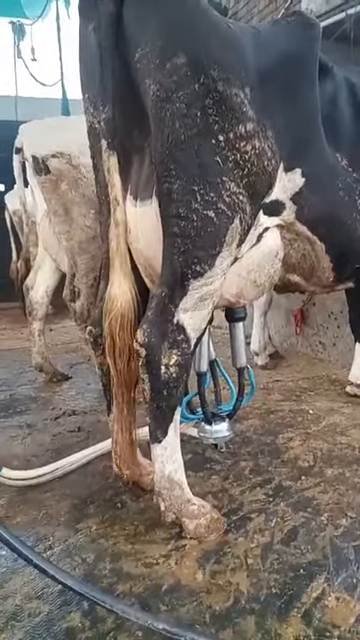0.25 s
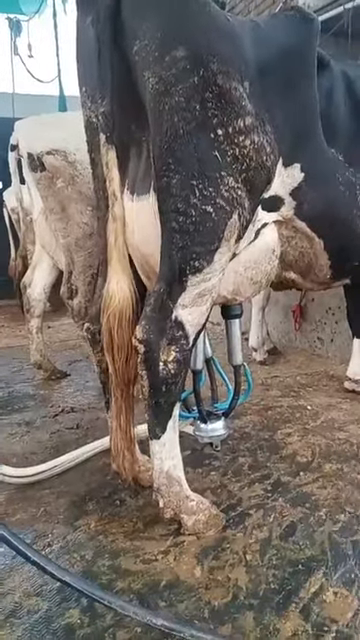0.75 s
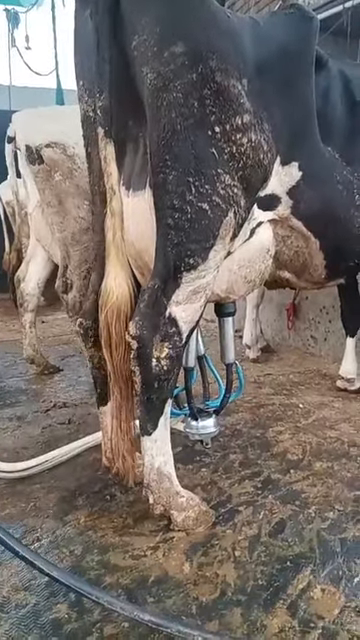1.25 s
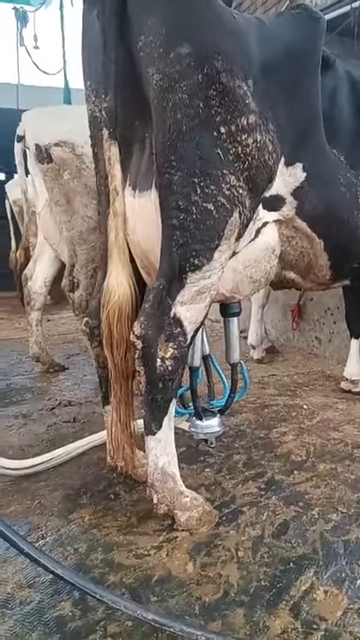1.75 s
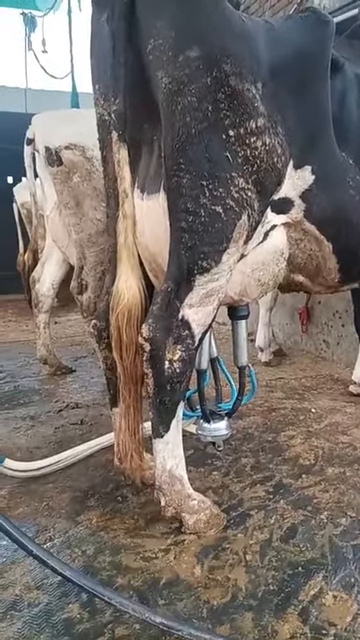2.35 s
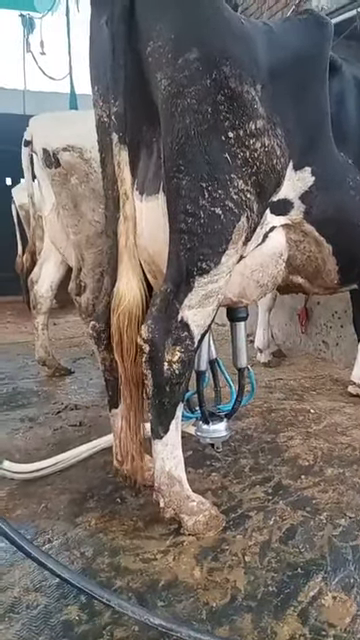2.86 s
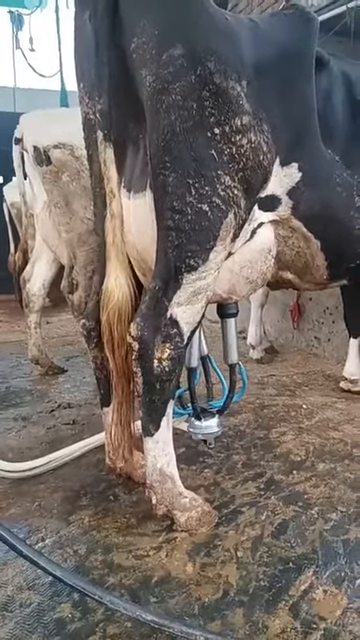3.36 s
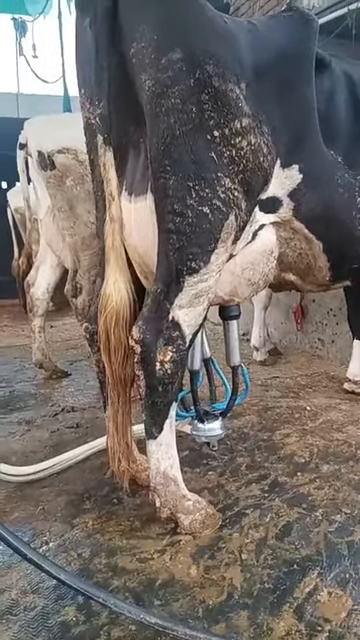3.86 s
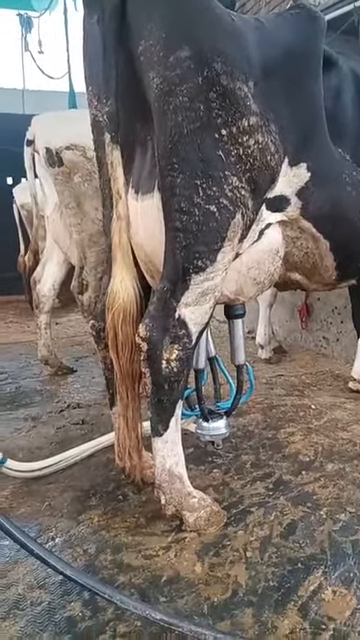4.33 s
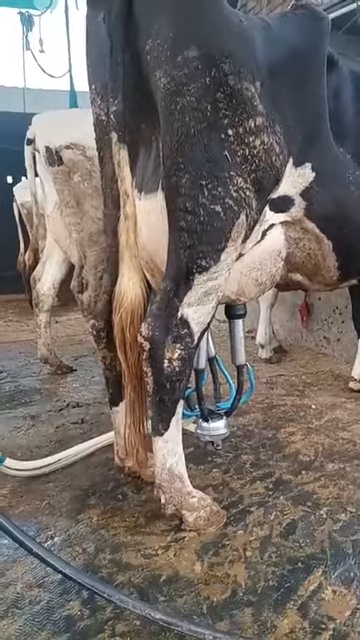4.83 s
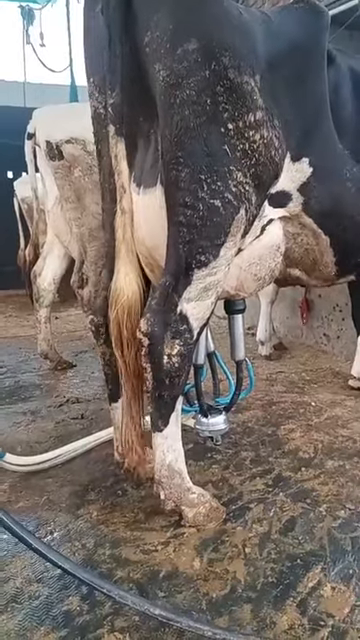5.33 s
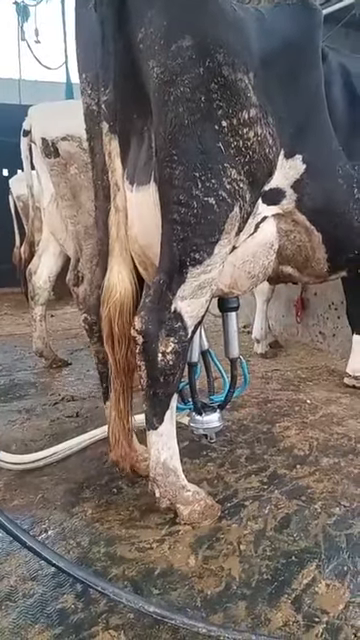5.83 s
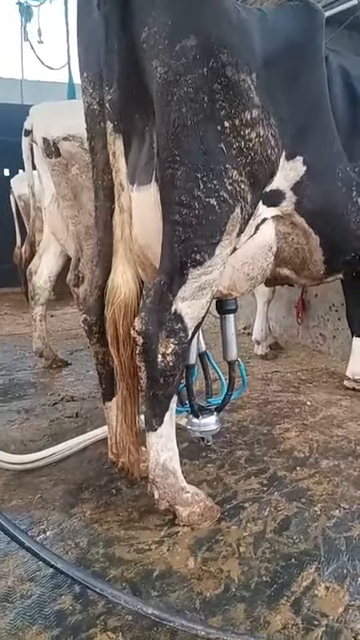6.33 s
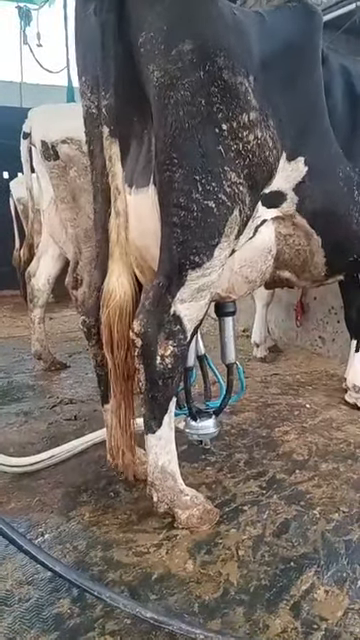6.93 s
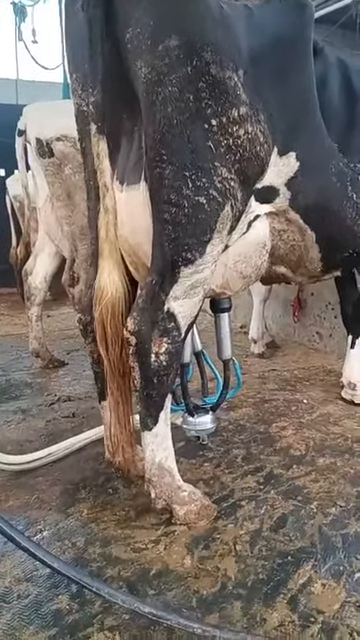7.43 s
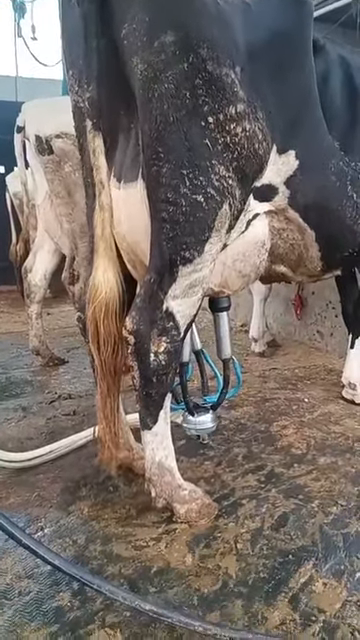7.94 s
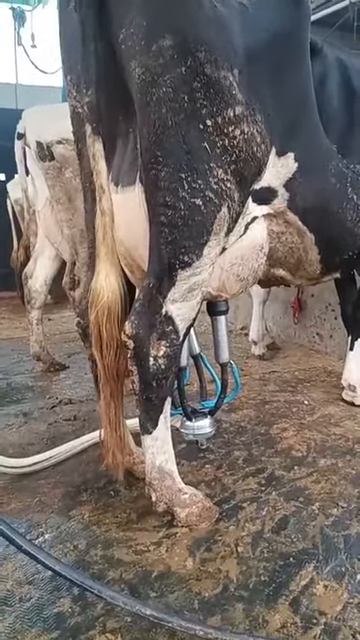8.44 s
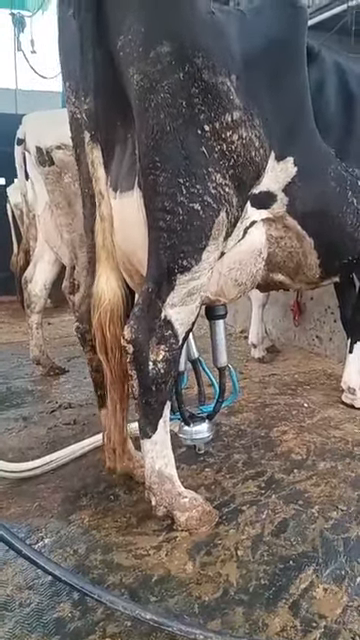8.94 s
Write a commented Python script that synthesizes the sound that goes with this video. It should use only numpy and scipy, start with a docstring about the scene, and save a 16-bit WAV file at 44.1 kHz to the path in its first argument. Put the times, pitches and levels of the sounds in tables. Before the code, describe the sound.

A milking machine runs in an open shed for the whole nine seconds or so. Its valve ticks sharply and evenly, a little over three times a second, each metallic click followed by a small puff and rush of air. Beneath it the vacuum pump makes a constant hum with uneven low chuffing, a rattling casing and a faint high whistle, while its belt rubs in a hissy pulse about six times a second. From about 1 to 3 seconds a small bird gives seven high, squeaky, gliding chirps, growing louder and harsher and echoing briefly under the roof. The machine then continues at the same pace, a few ticks ringing slightly brighter between 4 and 6 seconds. Dull, distant thuds sit low in the rumble at around 3.7, 8.3 and 8.9 seconds.

```python
"""A milking machine runs on a cow in an open shed. Its pulsator's slide strikes each end stop in turn,
ringing the valve body and letting air rush into the tubes. Beneath this the vacuum pump hums, booms,
rattles and whistles, and its belt rubs once a turn. A small bird gives seven squeaky chirps, gliding
harmonic tones that reverberate under the roof. A few dull thuds lie in the shed's low rumble."""
import sys
import numpy as np
from scipy import signal
from scipy.fft import rfft, irfft, next_fast_len
from scipy.io import wavfile
from scipy.ndimage import uniform_filter1d, map_coordinates

SR = 44100
rng = np.random.default_rng(int(sys.argv[2]) if len(sys.argv) > 2 else 0)


def to_wav(sig):
    """Store sig (one row per channel, or 1-D mono) as 16-bit WAV at the path in sys.argv[1].

    Samples outside -1..1 are clipped; the rate is SR.
    """
    pcm = np.clip(np.atleast_2d(sig), -1, 1) * 32767
    pcm = np.round(pcm).astype(np.int16)
    wavfile.write(sys.argv[1], SR, pcm.T)  # frames by channels


N = 405043
T = np.arange(N) / SR
SIZE = next_fast_len(N, True)
FREQ = np.maximum(np.arange(SIZE // 2 + 1) * SR / SIZE, 1)
SWAY_HZ = 1.522  # slow swing in the level of hum and casing

# Slow changes in the level of exhaust and casing. Each row: time in seconds, gain in dB.
PUMP_LOAD = [(0, 1), (1.7, -0.5), (1.95, -1), (2.3, -0.5), (2.56, -0.5), (2.8, 2.5), (3.1, -1.5),
             (3.6, 1.5), (4.4, 1.5), (5.1, 1), (6.15, 1), (6.37, -2), (6.6, 2), (7.35, -1), (7.9, 1),
             (9.1, 0.5)]


def undb(db):
    """Decibels to amplitude ratio."""
    return 10 ** (np.asarray(db) / 20)


def unit(x):
    """Normalise to rms 1."""
    return x / np.sqrt(np.mean(x ** 2))


def even(x):
    """Hold the running rms at 1, keeping the fast grain."""
    return x / np.sqrt(uniform_filter1d(x ** 2, size=3500))


def slope(points):
    """Frequency response through (Hz, dB) points, rolling off beyond both ends."""
    hz, db = np.transpose(points)
    gain = undb(np.interp(np.log(FREQ), np.log(np.sort(hz)), db))
    return gain * np.minimum(FREQ / hz.min(), 1) ** 3 * np.minimum(hz.max() / FREQ, 1) ** 6


def resonances(modes, skirt):
    """Response of (Hz, width in Hz, dB) modes added in power; skirt steepens their flanks."""
    powers = (undb(db) ** 2 / (1 + ((FREQ - hz) / width) ** 2) ** skirt for hz, width, db in modes)
    return np.sqrt(sum(powers))


def colour(x, gain):
    """Filter by a frequency response."""
    return irfft(rfft(x, SIZE) * gain, SIZE)[:N]


def walk(rate_hz):
    """Low-pass random fluctuation of rms 1."""
    draws = rfft(rng.standard_normal(SIZE // 16))
    return unit(irfft(draws * np.exp(-(FREQ[:len(draws)] / rate_hz) ** 2), SIZE)[:N])


def noise(gain, grain_db=0):
    """Coloured noise of rms 1; grain_db breaks its excitation into millisecond bursts."""
    grain = undb(grain_db * walk(400)) if grain_db else 1
    return unit(colour(rng.standard_normal(N) * grain, gain))


def hiss(points, flicker_db, count=11):
    """Turbulence: interleaved narrow noise bands fluctuate independently in level."""
    band_hz, hold_s = 150, .06
    spectrum = rfft(rng.standard_normal(SIZE)) * slope(points)
    band = (FREQ / band_hz).astype(int) % count
    knots = np.arange(0, T[-1] + hold_s, hold_s)
    gains = undb(flicker_db * rng.standard_normal((count, len(knots))))
    return unit(sum(irfft(spectrum * (band == k), SIZE)[:N] * np.interp(T, knots, gains[k])
                    for k in range(count)))


def cycle(hz, crest_s):
    """Sinusoidal swing between -1 and 1."""
    return np.cos(2 * np.pi * hz * (T - crest_s))


def bursts(rows, rise_s, fall_s):
    """Envelope of (s, dB) bursts with exponential growth and decay."""
    out, age = np.zeros(N), T[:SR // 2]
    shape = (1 - np.exp(-age / rise_s)) * np.exp(-age / fall_s)
    for s, db in rows:
        start = max(int(s * SR), 0)
        out[start:start + len(age)] += undb(db) * shape[:N - start]
    return out


def surging(steady_db, rows, width_s):
    """Envelope of a running level with Gaussian (s, dB) surges added in power."""
    surges = sum(undb(db) ** 2 * np.exp(-((T - s) / width_s) ** 2) for s, db in rows)
    return np.sqrt(undb(steady_db) ** 2 + surges)


def shed(x, wet_db, t60, floor_db):
    """Reverberation: direct sound, a reflection off the concrete floor and a diffuse tail."""
    age = T[:SR]
    tail = rng.standard_normal(SR) * undb(-60 * age / t60) * (1 - np.exp(-age / .0052))
    response = undb(wet_db) * tail / np.sqrt(np.sum(tail ** 2))
    response[int(.0028 * SR)] += undb(floor_db)
    response[0] = 1
    return signal.fftconvolve(x, response / np.sqrt(np.sum(response ** 2)))[:N]


def throb():
    """Amplitude modulation, once per turn of the pump shaft."""
    return cycle(hz=5.235, crest_s=.186)


def waver(x):
    """Frequency modulation: every pitch drifts with the pump's speed."""
    return map_coordinates(x, [np.cumsum(1 + .005 * walk(5))], order=1, mode="mirror")


def belt_turn(delay_s):
    """Phase modulation: the belt's cycle runs early or late as it slips."""
    # Each row: time in seconds, lag in seconds.
    slip = [(.4, -.007), (1, 0.0051), (1.7, 0.0011), (2.5, -0.019), (3.9, -0.00013), (4.6, -0.00032),
            (5.5, -0.021), (6, -0.0098), (7.1, -0.014), (7.7, -0.01), (8.3, -0.00011), (9.1, 0.0071)]
    return cycle(hz=5.863, crest_s=.101 + delay_s + np.interp(T, *np.transpose(slip)))


def motor():
    """Forced vibration: the motor hums in a few wandering spectral lines."""
    # Each row: frequency in Hz, relative level in dB.
    lines = [(50, -25.5), (102.3, -22.5), (105, -5.5), (112, -11.5), (209.5, -9)]
    # Each row: time of a swell in seconds, level in dB.
    swells = [(2.40, -39), (2.87, -43), (3.08, -41.5), (3.51, -46), (4.91, -48), (6.34, -41), (6.71, -40),
              (7.10, -42.5), (7.48, -40), (7.70, -47), (8.39, -37), (8.91, -41)]
    hum = unit(sum(undb(db) * np.sin(2 * np.pi * np.cumsum(hz * (1 + .0111 * walk(5.64))) / SR)
                   for hz, db in lines))
    level_db = -51 + 1.6 * cycle(SWAY_HZ, crest_s=.41) + 2.6 * walk(13)
    return hum * surging(level_db, swells, width_s=.017)


def exhaust():
    """Resonance: uneven noise excites the exhaust's low modes, which boom and chuff."""
    # Each row: frequency in Hz, width in Hz, relative level in dB.
    modes = [(185.3, 20, -5), (216.5, 15, -2), (248, 12, 5.5), (286, 51, 2.5), (308, 39.5, 6),
             (344.2, 7.6, 7.5)]
    # Each row: time of a chuff in seconds, level in dB.
    chuffs = [(.538, -36.5), (.62, -39), (.8, -38.5), (.97, -38.5), (1.13, -48), (1.3, -39.5), (1.36, -35),
              (1.52, -37), (1.69, -37.5), (2.06, -39), (2.3, -40), (2.9, -64), (3.88, -52), (4.04, -35.5),
              (4.33, -48), (4.55, -35.5), (4.77, -34.5), (5.42, -35.5), (5.55, -39.5), (5.72, -41.5),
              (6.1, -43), (6.48, -42), (6.67, -38.5), (6.75, -37), (6.87, -42), (7.19, -36.5), (7.62, -41),
              (7.89, -38), (8.35, -40), (8.62, -40), (8.79, -44), (8.99, -38.5)]
    boom = even(waver(noise(resonances(modes, skirt=3.8), grain_db=3.5)))
    level_db = -45.5 + np.interp(T, *np.transpose(PUMP_LOAD)) + .5 * throb() + 2.6 * walk(27)
    return boom * surging(level_db, chuffs, width_s=.027)


def casing():
    """Modal vibration: each mode flares by itself; a shudder drives those near its pitch hardest."""
    # Each row: frequency in Hz, width in Hz, relative level in dB.
    modes = [(452, 24, -3), (583, 32, 2), (620, 64, -5.5), (622, 91, -3.5), (667, 20.4, 5), (745, 55, -5.5),
             (723, 28, -0.5), (796, 13, 10.5), (900, 25, -5), (1033, 40, -0.5), (1113.3, 15.7, 8),
             (1170, 40, -28), (1257, 78, -4), (1356.6, 20.3, 4), (1420, 22, -13.5), (1500, 46, -5),
             (1617, 20.8, 7), (1680, 12, -4), (1703, 40, -0.5), (1967, 97, -6)]
    # Each row: time of a shudder in seconds, level in dB, centre frequency in Hz.
    shudders = [(0.029, -38.5, 900), (.95, -38, 1400), (1.119, -38.5, 835), (1.502, -40.5, 900),
                (1.75, -35.5, 870), (2.842, -39, 900), (3.4, -40, 900), (4.1, -58, 800), (4.321, -37, 720),
                (4.68, -42, 800), (4.78, -36.5, 1000), (5.16, -40, 900), (5.36, -38.5, 1500),
                (5.52, -32.5, 1210), (5.73, -39.5, 1200), (6.07, -43, 800), (6.78, -42.5, 1200),
                (6.87, -40, 1300), (7.67, -38.5, 1020), (8.02, -48, 1100), (8.79, -50, 900),
                (8.97, -41, 1100)]
    rattle = np.zeros(N)
    for hz, width, db in modes:
        flare = undb(db + 3 * walk(7.4))
        rattle += flare * np.sqrt(width) * noise(resonances([(hz, width, 0)], skirt=1.64))
    level_db = -41.5 + np.interp(T, *np.transpose(PUMP_LOAD))
    swing_db = 1.5 * throb() + .7 * cycle(SWAY_HZ, crest_s=.21) + 1.16 * walk(120)
    out = even(waver(rattle)) * undb(level_db + swing_db)
    shaken = even(noise(resonances(modes, skirt=2.4), grain_db=5))
    width_s, width_octaves = .03, .8
    for s, db, hz in shudders:
        span = np.flatnonzero(np.abs(T - s) < .12)
        freq = np.maximum(np.fft.rfftfreq(len(span), 1 / SR), 1)
        band = np.exp(-(np.log2(freq / hz) / width_octaves) ** 2 / 2)
        ring = unit(irfft(rfft(shaken[span]) * band, len(span)))
        out[span] += ring * undb(db) * np.exp(-((T[span] - s) / width_s) ** 2 / 2)
    return out


def drone():
    """Light damping: the casing's strongest mode rings up as the pump labours."""
    # Each row: time of a surge in seconds, level in dB.
    surges = [(.01, -33), (.45, -42.5), (1.41, -36), (1.57, -47), (1.73, -48), (2.32, -43), (2.88, -37),
              (3.25, -47), (3.37, -35.5), (3.43, -40), (3.68, -47), (3.95, -52), (4.1, -40.5),
              (4.35, -40.5), (4.56, -45), (4.88, -39.5), (5.16, -43), (5.42, -40), (5.53, -42),
              (5.72, -41.5), (5.9, -48), (6.28, -43), (6.7, -53), (6.87, -47), (7.05, -44), (7.2, -40),
              (7.45, -45), (7.68, -43.5), (7.86, -38.5), (8.03, -35), (8.3, -40), (8.6, -44), (8.8, -40.5),
              (9, -33.5), (9.07, -46)]
    ring = even(waver(noise(resonances([(576.7, 8, 0)], skirt=2.25))))
    return ring * surging(-49 + 1.7 * throb(), surges, width_s=.032)


def whistle():
    """Pipe resonance: the vacuum line whistles, louder just after the belt grips."""
    # Each row: frequency in Hz, width in Hz, relative level in dB.
    modes = [(2294, 47, -2.5), (2406, 26, 3), (2746, 97, -0.5), (3252, 46, 5), (3140, 26, 5.5),
             (3171, 21, 9)]
    # Each row: time of a flare in seconds, level in dB.
    flares = [(3.22, -48), (3.86, -49), (4.56, -40.5), (4.74, -56), (5.08, -53), (5.75, -40), (5.91, -38.5),
              (6.44, -42), (6.93, -47), (8.45, -51), (9.02, -40.5)]
    pipe = even(waver(noise(resonances(modes, skirt=5.2), grain_db=3)))
    level_db = -50 + throb() + 2.8 * belt_turn(delay_s=.04) + 2.3 * walk(12)
    return pipe * surging(level_db, flares, width_s=.022)


def ambience():
    """Broadband background noise: the shed's rumble and the faint hiss of its air."""
    # Two spectra. Each row: frequency in Hz, relative level in dB.
    rumble_spectrum = [(20, -12.5), (50, -6.5), (90, 2.5), (140, -0.5), (400, -7.5), (900, -6.5),
                       (1800, -2.5), (2200, -26)]
    air_spectrum = [(2200, -13.5), (3250, 0.5), (3600, -31), (4300, -10.5), (7200, -8), (8000, -20),
                    (9800, -25), (10600, -61)]
    rumble = noise(slope(rumble_spectrum), grain_db=3.5) * undb(-50.5 + walk(4.3))
    return rumble + hiss(air_spectrum, flicker_db=5) * undb(-60.5)


def valve(strokes):
    """Impact excitation: the slide strikes alternate end stops, ringing the valve's damped modes."""
    # Each row: frequency in Hz, 60 dB decay time in seconds, relative dB at the first stop, at the second.
    modes = [(3245, 0.03, 0, -4), (3300, 0.032, -16, 8), (3700, 0.03, -2, -0.5), (4260, 0.0052, -10, -38),
             (4730, 0.043, -28, -10), (5300, 0.035, -21, -8), (5960, 0.035, -13, -1), (6160, 0.012, -3, 3),
             (6990, 0.034, 5.5, 5.5), (6730, 0.0077, 1, -1.5), (7940, 0.15, -17, -14.5),
             (9240, 0.012, -12.5, -32.5)]
    hz, t60, *side_db = np.transpose(modes)[:, :, None]
    out, age = np.zeros(N + SR), T[:SR // 8]
    attack = 1 - np.exp(-age / .00064)
    for k, (s, db) in enumerate(strokes):
        phase, detune, scatter = rng.standard_normal((3, len(hz), 1))
        partials = np.sin(2 * np.pi * (hz * (1 + .0054 * detune) * age + phase))
        decay = undb(side_db[k % 2] + 3 * scatter - 60 * age / t60)
        out[int(s * SR):][:len(age)] += undb(db) * (partials * decay).sum(0) * attack
    return out[:N]


def airflow(strokes):
    """Turbulent flow: air puffs in at the valve, then rushes through the tubes as the liners move."""
    # Two spectra. Each row: frequency in Hz, relative level in dB.
    puff_spectrum = [(2500, -33.5), (3400, 4.5), (4300, 0), (4900, -3), (5600, 4), (6300, 8.5), (7200, 5),
                     (7700, -5.5), (8500, -14), (9600, -48), (10500, -40)]
    rush_spectrum = [(2500, -19.5), (3500, -3.5), (4100, 6), (4700, 3.5), (5300, -2.5), (6100, -2.5),
                     (6700, -1), (7300, 0.5), (7700, -21), (8600, -14), (10000, -49)]
    wait_s, width_s = .0079, .045
    puffs = hiss(puff_spectrum, flicker_db=5) * bursts(strokes + [wait_s, 0], rise_s=.015, fall_s=.025)
    # Each row, one for each side: delay after the stroke in seconds, level in dB.
    liners = [(.19, -49.5), (.205, -52)]
    swell = sum(undb(db) * np.exp(-((T - s - delay) / width_s) ** 2)
                for side, (delay, db) in enumerate(liners) for s in strokes[side::2, 0])
    rush = hiss(rush_spectrum, flicker_db=3) * swell * undb(.5 + .67 * walk(1.8))
    return undb(-3.5) * puffs + rush


def pulsator():
    """Impact and friction: the slide knocks, rebounds and admits air, scraping on each return."""
    # Strokes over and back in turn. Each row: start in seconds, relative level in dB.
    strokes = [(0.0348, -32), (.3345, -36), (.6235, -32.5), (0.923, -34.5), (1.2115, -34), (1.51, -34),
               (1.8, -34.5), (2.098, -42), (2.387, -35), (2.687, -31), (2.972, -33), (3.275, -36),
               (3.5605, -34), (3.8589, -36.5), (4.1465, -33.5), (4.444, -38.5), (4.7333, -33),
               (5.032, -35.5), (5.3197, -32), (5.6172, -34), (5.903, -32.5), (6.2005, -36.5),
               (6.4865, -35.5), (6.785, -36.5), (7.0687, -31.5), (7.367, -34.5), (7.6525, -33),
               (7.9505, -34), (8.2352, -32.5), (8.5328, -34.5), (8.8166, -33), (9.1145, -36.5)]
    strokes = np.array(strokes)
    lead_s = .0055
    scrape = noise(slope([(3000, 8), (5500, -1), (7500, -3), (8500, -30)]))
    scrape *= bursts(strokes[1::2] - [lead_s, 0], rise_s=.0016, fall_s=.0021)
    rebounds = strokes + rng.uniform([.004, -12], [.013, -2], strokes.shape)  # later and weaker
    crack = noise(slope([(2500, -4), (3500, -1), (7200, -2.5), (8200, -11), (10500, -14.5)]))
    crack *= bursts(np.vstack([strokes, rebounds]), rise_s=.001, fall_s=.0028)
    knocks = shed(undb(-3) * valve(strokes) + undb(4) * crack, wet_db=-13, t60=.25, floor_db=-14)
    return undb(-.5) * scrape + undb(-3) * knocks + airflow(strokes)


def belt():
    """Friction noise: the belt rubs its pulley for half of each turn and almost lets go between."""
    # A band and its octave. Each row: frequency in Hz, relative level in dB.
    spectrum = [(1700, -36), (2250, -5), (2480, -4), (2620, 8), (2850, 1.5), (3050, 5.5), (3300, -26.5),
                (3500, -57), (4600, -47), (5100, -8), (5500, -7), (5850, -7.5), (6400, -31.5),
                (8300, -23.5), (9500, -64.5)]
    # How hard the belt rubs. Each row: time in seconds, level in dB.
    rubbing = [(.1, -44), (.25, -40), (.45, -40.5), (1.6, -41.5), (3, -43), (3.4, -42), (4.6, -42.5),
               (5.4, -39), (7, -42.5), (8.5, -40.5)]
    grip = (1 + np.tanh(2 * belt_turn(delay_s=0) - .35)) / 2
    rub = even(hiss(spectrum, flicker_db=5))
    return rub * (.02 + grip) * undb(np.interp(T, *np.transpose(rubbing)) + 1.4 * walk(8))


def chirp(t, rasp, curve):
    """A frequency-modulated harmonic series starts hoarse, sweeps up, then sinks trembling."""
    fundamental_db, fourth_db = -15, -16  # relative to the second and third harmonics
    rasp_db, hoarse_db, hoarse_s, tremble_hz = -19, 14, .024, 110
    s, second_hz, second_db, third_db = np.transpose(curve)
    pitch_hz = uniform_filter1d(np.interp(t, s, second_hz), size=200) / 2
    second, third = undb(np.interp(t, s, second_db)), undb(np.interp(t, s, third_db))
    jitter, drift = rng.standard_normal((2, len(t)))
    quaver = .02 * unit(uniform_filter1d(jitter, size=40))
    rate_hz = tremble_hz * (1 + unit(uniform_filter1d(drift, size=200)) / 2)
    tremble = .012 * np.sin(2 * np.pi * np.cumsum(rate_hz) / SR)
    phase = 2 * np.pi * np.cumsum(pitch_hz * (1 + quaver + tremble)) / SR
    age = t - t[0]
    clear = 1 - np.exp(-(age / hoarse_s / 2) ** 2)  # overtones emerge as the hoarseness fades
    harmonics = [second * undb(fundamental_db), second, third * clear,
                 third * clear ** 2 * undb(fourth_db)]
    tone = sum(np.sqrt(2) * gain * np.sin(k * phase) for k, gain in enumerate(harmonics, 1))
    hoarse = np.hypot(second, third) * undb(rasp_db + hoarse_db * np.exp(-age / hoarse_s))
    return (tone + rasp * hoarse) * signal.windows.tukey(len(t), .13)


def bird():
    """Source and filter: chirps, growing louder and harsher, pass the resonances of throat and beak."""
    # One curve a chirp. Each row: time in seconds, frequency of the second harmonic in Hz,
    # source levels of the second and third harmonics in dB.
    curves = [
        [(1.005, 4400, -49, -66), (1.025, 4580, -45, -64), (1.05, 4230, -34.5, -57), (1.08, 4130, -29, -56),
         (1.097, 4020, -35, -55), (1.11, 3640, -44, -52)],
        [(1.343, 3300, -42, -60), (1.35, 4110, -35.5, -66), (1.361, 5130, -42, -58), (1.383, 4470, -31.5, -52),
         (1.41, 4230, -29.5, -49), (1.435, 3930, -26, -46), (1.452, 3980, -29, -42), (1.468, 3300, -48, -49)],
        [(1.595, 3110, -33.5, -44), (1.607, 4040, -32, -46), (1.618, 4670, -31, -34), (1.635, 4250, -29.5, -47),
         (1.654, 4244, -25.5, -45), (1.675, 3856, -27.5, -35), (1.7, 3840, -27, -37.5), (1.717, 3370, -42, -41)],
        [(2.032, 3036, -34, -46), (2.042, 3930, -31.5, -51), (2.053, 5000, -33, -45), (2.066, 4550, -27, -40),
         (2.092, 4250, -30, -45), (2.122, 3780, -24, -38), (2.142, 3710, -25, -30), (2.156, 3120, -40, -38)],
        [(2.299, 2750, -37, -34), (2.316, 4030, -26, -37), (2.334, 4710, -31, -36), (2.345, 4220, -34, -44),
         (2.354, 4170, -23, -36), (2.378, 3557, -28, -31), (2.402, 3516, -27, -28), (2.416, 3170, -41, -40)],
        [(2.583, 2650, -35, -35), (2.597, 3620, -28, -26), (2.612, 4640, -25.5, -41), (2.63, 4030, -31, -38),
         (2.648, 3960, -21.5, -30), (2.668, 3620, -25.5, -27), (2.69, 3740, -22.5, -31),
         (2.706, 3060, -32, -29.5)],
        [(2.85, 2630, -31, -32), (2.866, 3700, -29.5, -20), (2.879, 4410, -24, -36), (2.9, 4190, -30.5, -43),
         (2.917, 4090, -20.5, -46), (2.938, 3470, -28, -21), (2.962, 3670, -33, -34), (2.975, 3050, -33, -33)],
    ]
    # Each row: frequency in Hz, gain in dB.
    throat = [(1800, -11), (2300, 10), (2900, 0), (3700, -0.5), (4400, 2), (4950, -0.5), (5500, 2),
              (6200, 1), (7200, 3.5), (8100, 1), (8900, 6.5), (10000, -1)]
    out, flutter = np.zeros(N), undb(1.2 * walk(150))
    rasp = noise(slope([(1800, -8), (2400, 6.5), (4000, -16), (5300, 5), (6500, -.5),
                        (7400, -9), (8200, -6.5), (9000, -12), (10000, -38)]))
    for curve in curves:
        span = np.flatnonzero((T > curve[0][0] - .005) & (T < curve[-1][0] + .005))
        out[span] += chirp(T[span], rasp[span], curve)
    return shed(colour(out * flutter, slope(throat)), wet_db=-4, t60=.29, floor_db=-13)


def thuds():
    """Masking: dull distant bumps are nearly buried in the hum."""
    # Each row: start in seconds, relative level in dB.
    bumps = [(3.73, -37.5), (8.29, -32), (8.90, -30)]
    low_band = noise(slope([(110, -17), (140, -29), (175, 23), (220, 7)]))
    return low_band * bursts(bumps, rise_s=.032, fall_s=.056)


def clinks():
    """Free decay: a square hit on the valve's end stop leaves a short ring."""
    # Each row: start in seconds, relative level in dB.
    hits = [(3.8595, -36), (4.4445, -28.5), (5.0315, -35), (5.3183, -40), (5.903, -40), (6.2013, -32)]
    ring_hz, t60 = 3620, .027
    ring = even(noise(resonances([(ring_hz, 110, 0)], skirt=2.3)))
    return ring * bursts(hits, rise_s=.002, fall_s=t60 / np.log(1000))


def scene():
    """Superposition of machine, bird and shed in one channel."""
    pump = motor() + exhaust() + casing() + drone() + whistle()
    return (pump + ambience() + pulsator() + belt() + bird() + thuds() + clinks())[None]


def record(dry):
    """A steep low-pass filter removes the highest treble."""
    cutoff_hz = 10450
    return signal.sosfilt(signal.ellip(10, .2, 70, cutoff_hz, fs=SR, output="sos"), dry)


dry = scene()
out = record(dry)
to_wav(out)
```